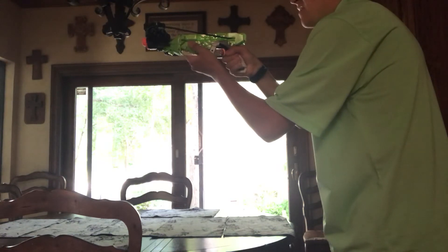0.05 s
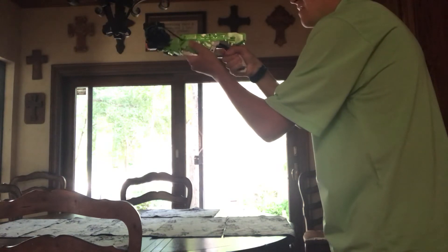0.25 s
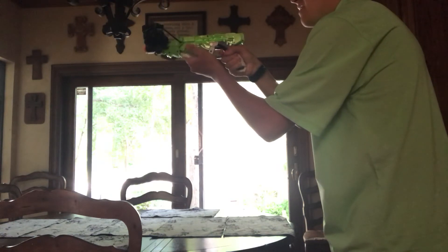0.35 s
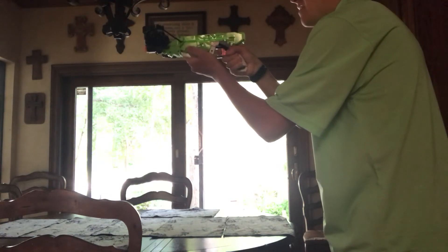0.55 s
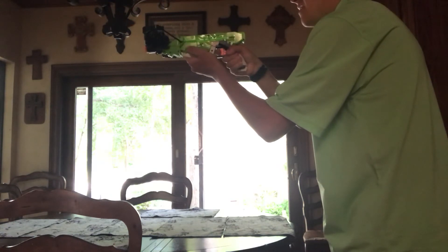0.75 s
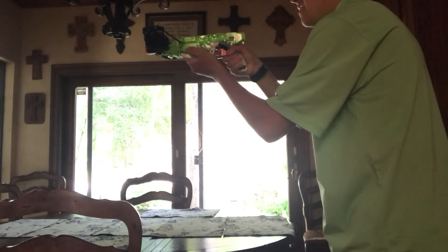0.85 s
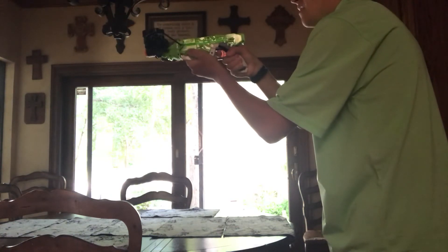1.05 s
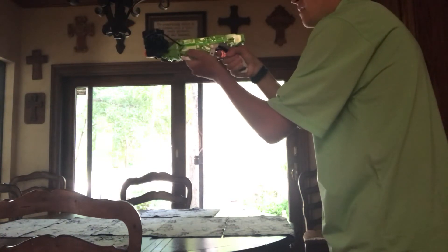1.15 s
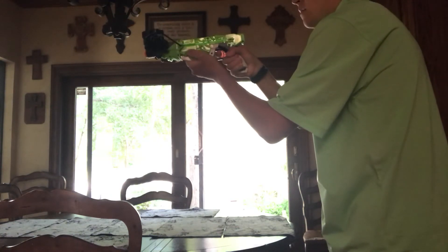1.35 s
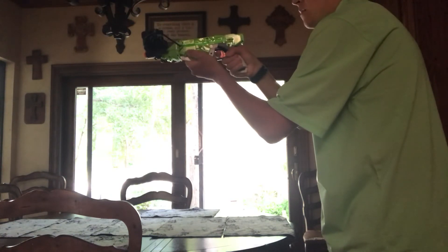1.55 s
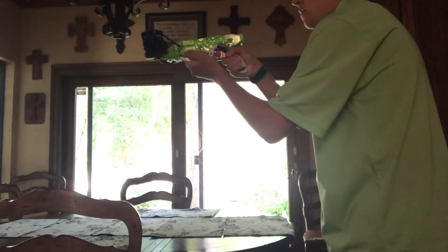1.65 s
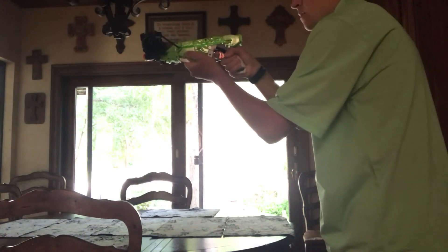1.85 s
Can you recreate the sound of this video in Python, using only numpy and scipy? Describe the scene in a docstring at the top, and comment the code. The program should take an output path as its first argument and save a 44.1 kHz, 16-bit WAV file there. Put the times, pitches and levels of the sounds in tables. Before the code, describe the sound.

In an echoing dining room, a plastic toy crossbow cracks loudly near the microphone. Loose parts rattle, a faint whistle leads to a softer, distant thump, and the dart drops with a few light taps.

```python
"""A toy crossbow is fired in a hard-walled dining room, over soft air and a faint appliance hum.
The trigger spring pings, the latch ticks, and the string slams home in a run of hard cracks that set
the plastic frame ringing. The slack string buzzes against the stock and loose parts rattle.
The dart whistles across the room while the latch ticks again, then thumps into a far surface,
which rings. Last, the dart drops and bounces lightly on the floor."""
import sys
import numpy as np
from scipy import signal
from scipy.fft import rfft, irfft, next_fast_len
from scipy.io import wavfile

SR = 44100
rng = np.random.default_rng(int(sys.argv[2]) if len(sys.argv) > 2 else 0)


def master_out(mix):
    """Clip the mix to full scale and print it as 16-bit PCM to the path in sys.argv[1]."""
    frames = np.transpose(np.atleast_2d(mix))
    ceiling = np.clip(frames, -1, 1)
    pcm = np.round(ceiling * 32767).astype(np.int16)
    wavfile.write(sys.argv[1], SR, pcm)


N = 83790
TIME = np.arange(N) / SR


def from_db(db):
    """Decibels to gain."""
    return 10 ** (np.asarray(db) / 20)


def rms_one(x):
    """Scale to an rms of one."""
    return x / np.sqrt(np.mean(x ** 2) + 1e-20)


def at_hz(points, hz):
    """Read a curve on a log-frequency axis."""
    freqs, values = np.transpose(points)
    return np.interp(np.log(np.maximum(hz, 1)), np.log(freqs), values)


def eq(x, curve):
    """Minimum-phase EQ at unit power gain: the curve sets the tone, with no ringing ahead of a hit."""
    size = next_fast_len(N) * 2
    gain = rms_one(from_db(at_hz(curve, np.fft.rfftfreq(size, 1 / SR))))
    cepstrum = irfft(np.log(gain))
    cepstrum[1:size // 2] *= 2
    cepstrum[size // 2 + 1:] = 0
    return irfft(rfft(x, size) * np.exp(rfft(cepstrum)))[:N]


def linger(power, t60):
    """Stored energy leaks away, falling 60 dB in t60 seconds."""
    return signal.lfilter([1], [1, -from_db(-60 / (t60 * SR)) ** 2], power + 1e-18)


def bursts(hits, rise_s=.0001):
    """Each hit is a burst of noise with an exponential attack and decay."""
    power = np.zeros(N)
    for time, db, decay in hits:
        age = TIME - time
        envelope = from_db(db) * np.exp(-np.maximum(age / decay, -age / rise_s))
        power += envelope ** 2
    return np.sqrt(power) * rng.choice([-1, 1], N)


def impulses(hits):
    """Each hit is a single click with the energy of its burst's decay."""
    clicks = np.zeros(N)
    for time, db, decay in hits:
        clicks[int(time * SR)] += from_db(db) * np.sqrt(decay * SR / 2)
    return clicks


def ring(clicks, hz, t60):
    """One resonance: every click adds energy, which leaks away."""
    return np.sqrt(linger(clicks ** 2, t60)) * np.sin(2 * np.pi * (hz * TIME + rng.random()))


def struck(hits, modes, level_db):
    """A run of hits rings all the modes of a body."""
    clicks = impulses(hits)
    return sum(from_db(db + level_db) * ring(clicks, hz, t60) for hz, db, t60 in modes)


# reverb decay of the hard-walled room (frequency [Hz], t60 [s])
ROOM_T60 = [(80, .6), (250, 0.68), (600, .75), (1400, .88), (4000, 0.71), (8000, 0.68), (11000, 0.41),
            (16000, 0.18)]
EARLY_T60_S, BUILD_UP_S = .29, .0013
NEAR_EARLY_DB, FAR_EARLY_DB = 6.5, -2   # early reflections over the tail: they dominate up close
NEAR_TAIL, FAR_TAIL = 1.116, .93   # t60 multipliers; the buzzing crossbow draws out its own tail

def room(x, wet_db, early_db=NEAR_EARLY_DB, tail_scale=1):
    """A dry hit plus its reverb: dense early reflections and a tail that dies band by band."""
    hz = np.fft.rfftfreq(N, 1 / SR)
    centres = np.geomspace(60, 16000, 12)
    white = rfft(rng.standard_normal(N))
    build = np.exp(-1 / (BUILD_UP_S * SR))
    power = signal.lfilter([1 - build], [1, -build], x ** 2)
    early = from_db(early_db) ** 2 * linger(power, EARLY_T60_S)
    wet = np.zeros(N)
    for centre, weights in zip(centres, np.eye(len(centres))):
        band = irfft(white * at_hz(np.column_stack([centres, weights]), hz), N)
        late = linger(power, tail_scale * at_hz(ROOM_T60, centre))
        wet += band * np.sqrt(early + late)
    return x + from_db(wet_db) * wet * np.linalg.norm(x) / np.linalg.norm(wet)


# dark bed of air (frequency [Hz], relative gain [dB])
AIR_EQ = [(15, -50), (25, -22), (48, -5), (87, -12), (242, -12), (309, -12.5), (363, -10.5), (545, -19.5),
          (677, -16), (988, -18), (1840, -21), (16000, -39.5)]
# partials of the appliance hum (frequency [Hz], rms level [dB])
HUM_PARTIALS = [(59.5, -73.5), (118, -80), (240, -74)]

def room_tone():
    """The bed: soft air noise and the steady low hum of an appliance."""
    hum = sum(from_db(db) * np.sqrt(2) * np.sin(2 * np.pi * (hz * TIME + rng.random()))
              for hz, db in HUM_PARTIALS)
    air = rms_one(eq(rng.standard_normal(N), AIR_EQ))
    return hum + from_db(-64.5) * air


# the dart taps the floor (time [s], level [dB], decay [s])
BOUNCE_HITS = [(1.269, -64, .004), (1.281, -50.5, 0.0053), (1.291, -49, 0.0044), (1.317, -66, 0.0051),
               (1.372, -68.5, 0.0052), (1.465, -60.5, .006), (1.592, -76, 0.0045), (1.685, -67, .008),
               (1.765, -73.5, 0.0054)]
# thin, midrange clack (frequency [Hz], relative gain [dB])
BOUNCE_EQ = [(200, -19.5), (1200, -5), (1700, 1.5), (2100, 7), (2700, -9.5), (4000, -14), (6000, -37),
             (16000, -44)]

def dart_bounces():
    """The fallen dart clatters lightly on the floor, heard mostly as reverb."""
    return eq(room(bursts(BOUNCE_HITS), wet_db=6.5, early_db=FAR_EARLY_DB), BOUNCE_EQ)


# the trigger takes up its spring (time [s], level [dB], decay [s])
SPRING_HITS = [(.1370, -46.5, .004)]
# narrow, bright ping (frequency [Hz], relative gain [dB])
SPRING_EQ = [(300, -14.5), (1300, -2.5), (3200, -15.5), (4400, 8.5), (5800, -13.5), (10000, -21),
             (16000, -28)]
# small clicks of trigger and latch (time [s], level [dB], decay [s])
LATCH_HITS = [(.2108, -41.5, 0.0013), (.2172, -43.5, 0.0019), (.7283, -41.5, 0.0048), (.7595, -38, 0.0031),
              (.780, -37, 0.0017), (.787, -49, .002)]
# crisp tick (frequency [Hz], relative gain [dB])
LATCH_EQ = [(300, -20.5), (2000, -6.5), (4300, 7), (7000, -5), (12000, -9), (16000, -14.5)]

def trigger():
    """The spring pings; the latch ticks before and after the shot."""
    spring = eq(room(bursts(SPRING_HITS), wet_db=6), SPRING_EQ)
    latch = eq(room(bursts(LATCH_HITS), wet_db=2), LATCH_EQ)
    return spring + latch


# pitch and volume curves of the whistle (time [s], pitch [Hz], level [dB])
WHISTLE_PATH = [(.58, 2400, -56), (.615, 2360, -47), (.64, 2330, -42), (.69, 2360, -42.5),
                (.718, 2320, -54), (.765, 2360, -53), (.80, 2390, -47), (.83, 2300, -47),
                (.855, 2240, -43.5), (.882, 2250, -51)]
WAVER_HZ, FLUTTER_DB, WOBBLES_PER_S = 75, 2, 160   # depths and rate of the random modulation

def dart_whistle():
    """The flying dart whistles unsteadily until it lands; its echoes beat against the tone."""
    times, hz, db = np.transpose(WHISTLE_PATH)
    waver = np.interp(TIME * WOBBLES_PER_S, np.arange(N), rng.standard_normal(N))
    flutter = np.interp(TIME * WOBBLES_PER_S, np.arange(N), rng.standard_normal(N))
    pitch = np.interp(TIME, times, hz) + WAVER_HZ * waver
    level = np.interp(TIME, times, from_db(db), left=0, right=0) * from_db(FLUTTER_DB * flutter)
    tone = level * np.sin(2 * np.pi * np.cumsum(pitch) / SR)
    echoes = room(signal.unit_impulse(N), wet_db=-1, early_db=FAR_EARLY_DB)
    return signal.fftconvolve(tone, echoes)[:N]


# swells of string buzz (time [s], level [dB], decay [s])
BUZZ_SWELLS = [(.345, -42, 0.032), (.44, -43.5, 0.12)]
# bright, raspy edge (frequency [Hz], relative gain [dB])
BUZZ_EQ = [(200, -29), (900, -6), (2300, -0.5), (4000, 4.5), (6500, -6.5), (9500, -12.5), (11200, -10),
           (16000, -18.5)]

def string_buzz():
    """The slack string buzzes against the stock: two noisy swells in the tail of the shot."""
    return eq(room(bursts(BUZZ_SWELLS, rise_s=.015), wet_db=.5), BUZZ_EQ)


# knocks of loose parts (time [s], level [dB], decay [s], ring pitch [Hz], relative ring level [dB])
RATTLE_HITS = [(.5140, -38, 0.0065, 1586, -10), (.547, -35, 0.03, 1254, -24),
               (.558, -34, 0.0081, 1172, -21), (0.5686, -25.5, 0.0047, 1287, -28),
               (.578, -36.5, 0.0087, 1224, -13.5)]
# mid-heavy plastic knock (frequency [Hz], relative gain [dB])
RATTLE_EQ = [(100, -40), (350, -27), (600, -14.5), (1200, 2.5), (2000, -1.5), (3000, 0.5), (5000, -5.5),
             (8000, -15.5), (16000, -29.5)]

def rattle():
    """Loose parts knock, each with a short hollow ring that carries on faintly in the room."""
    knocks = bursts([hit[:3] for hit in RATTLE_HITS])
    out = eq(room(knocks, wet_db=0), RATTLE_EQ)
    for time, db, decay, hz, ring_db in RATTLE_HITS:
        click = from_db(ring_db) * impulses([(time, db, decay)])
        hollow = ring(click, hz, t60=.03)
        room_tail = from_db(-17.5) * ring(click, hz, at_hz(ROOM_T60, hz))
        out += hollow + room_tail
    return out


# the tip cracks on arrival (time [s], level [dB], decay [s])
TIP_HITS = [(.8812, -31, 0.0061)]
# sharp top layer (frequency [Hz], relative gain [dB])
TIP_EQ = [(200, 4), (1500, 2.5), (4000, 6), (8000, -21), (12000, -1.5), (16000, -9)]
# the dart strikes and flexes (time [s], level [dB], decay [s])
THUMP_HITS = [(.8810, -37.5, 0.0043), (.8838, -24.5, 0.0031), (.898, -32, 0.0063), (.918, -32.5, 0.0059)]
# weight in the lows and mids (frequency [Hz], relative gain [dB])
THUMP_EQ = [(15, -32), (40, -28), (75, 3), (170, 3), (260, 1.5), (380, -5.5), (700, 1.5), (1000, 2.5),
            (1600, -1), (2800, -8.5), (4500, -7), (8000, -14.5), (16000, -31.5)]
# resonances of the struck surface (frequency [Hz], relative level [dB], t60 [s])
SURFACE_RING = [(161.7, -18.5, .45), (247, -20.5, 0.38), (889, -17.5, 0.65), (1005, -17, .62),
                (1018, -19.5, 0.54), (1170, -27, 0.95), (1562, -24, 0.7)]

def dart_impact():
    """The dart hits a far surface with a crack and a thump, and leaves it ringing."""
    tip = room(bursts(TIP_HITS), wet_db=1.5, early_db=FAR_EARLY_DB, tail_scale=FAR_TAIL)
    thump = room(bursts(THUMP_HITS), wet_db=8.5, early_db=FAR_EARLY_DB, tail_scale=FAR_TAIL)
    surface = struck(THUMP_HITS, SURFACE_RING, level_db=-13.5)
    return eq(tip, TIP_EQ) + eq(thump, THUMP_EQ) + surface


# the string slams the dart out (time [s], level [dB], decay [s])
RELEASE_HITS = [(.2238, -7.5, 0.0023)]
# broad crack with little bass (frequency [Hz], relative gain [dB])
RELEASE_EQ = [(15, -41), (150, -28), (400, -17), (700, -1.5), (1100, 2.5), (2000, -2), (4200, 1.5),
              (7500, -6.5), (11000, -4), (16000, -11)]
# string and limbs hit their stops (time [s], level [dB], decay [s])
SNAP_HITS = [(.2293, -11, 0.0049), (.2340, -2, 0.0013), (.2404, -8, 0.0016), (.2515, -22.5, 0.0027)]
# hard snap with a presence peak (frequency [Hz], relative gain [dB])
SNAP_EQ = [(15, -47), (50, -32.5), (130, -26), (250, -27), (400, -17), (650, -19.5), (1000, -2),
           (2000, -0.5), (4200, 4.5), (6500, -1.5), (9000, -9), (11200, -7.5), (16000, -14)]
# resonances of the plastic frame (frequency [Hz], relative level [dB], t60 [s])
FRAME_RING = [(369.6, -43, 0.52), (1222, -23, 0.47), (1420, -34, .7), (2367, -29.5, 0.83),
              (2970, -27.5, .4), (3350, -20.5, .33), (3670, -24, 0.85), (4100, -26, .65),
              (3920, -26.5, 0.34), (4070, -16.5, 0.41), (4760, -24, 0.91), (5090, -25.5, 0.15),
              (6430, -34, 0.28), (11350, -30, 0.58)]
RELEASE_RISE_S = .0005   # the string gathers speed before it hits

def crossbow_shot():
    """The string fires the dart, then hits its stops in a run of cracks that ring the frame."""
    release = room(bursts(RELEASE_HITS, RELEASE_RISE_S), wet_db=-3.5, tail_scale=NEAR_TAIL)
    snaps = room(bursts(SNAP_HITS), wet_db=2.5, tail_scale=NEAR_TAIL)
    frame = struck(SNAP_HITS, FRAME_RING, level_db=-21)
    return eq(release, RELEASE_EQ) + eq(snaps, SNAP_EQ) + frame


def scene():
    """Mono mix: the crossbow up close, the dart across the room, room tone underneath."""
    crossbow = trigger() + crossbow_shot() + string_buzz() + rattle()
    dart = dart_whistle() + dart_impact() + dart_bounces()
    return (crossbow + dart + room_tone())[None]


CUTOFF_HZ = 15900

def record(dry):
    """The loudest peaks clip, then a steep low-pass trims the very top."""
    low_pass = signal.ellip(12, .1, 100, CUTOFF_HZ, fs=SR, output="sos")
    return signal.sosfilt(low_pass, np.clip(dry, -1, 1))


dry = scene()
out = record(dry)
master_out(out)
```